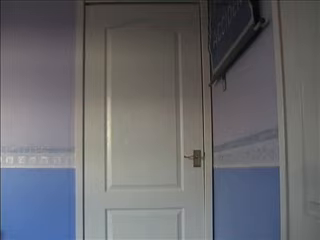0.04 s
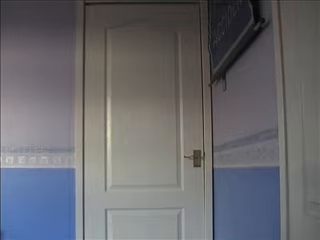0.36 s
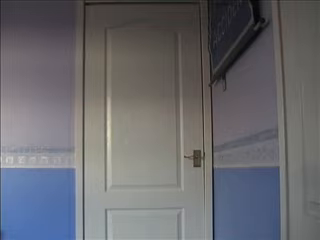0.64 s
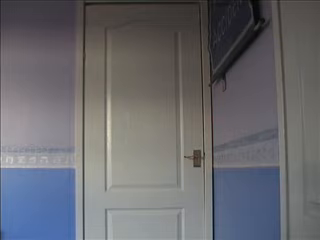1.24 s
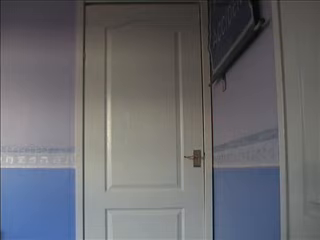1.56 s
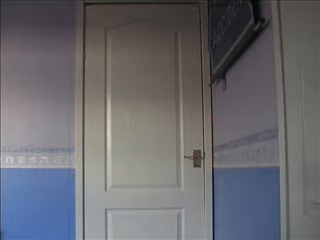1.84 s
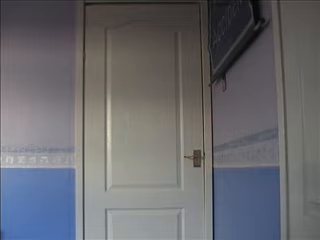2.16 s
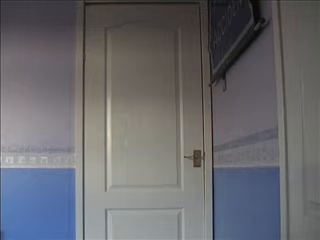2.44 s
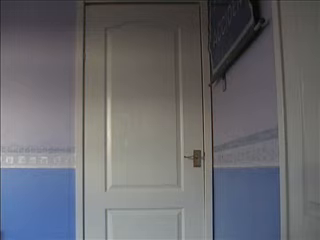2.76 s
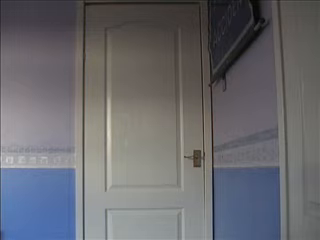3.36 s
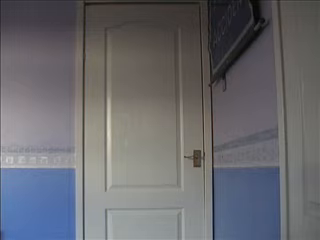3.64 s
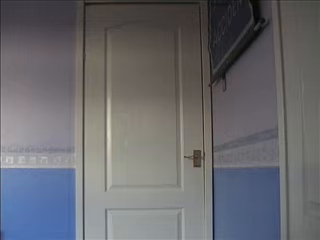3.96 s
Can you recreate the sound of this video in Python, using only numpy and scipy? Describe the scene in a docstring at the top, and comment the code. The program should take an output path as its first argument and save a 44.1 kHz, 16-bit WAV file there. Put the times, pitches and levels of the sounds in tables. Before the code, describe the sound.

Low electrical hum slowly swelling indoors, with a faint fan and a few soft rustles.

```python
"""Mains hum swells slowly in a quiet room, with the tones of a running fan and a wash of air.
Two near-equal hums beat; the fan sounds at multiples of its shaft rate, other motors farther off.
Soft floor bumps and faint rustles sound nearby, as of someone shifting their weight.
The camera adds its own hiss and thin whine, and its hum filter cuts a row of narrow notches."""
import sys
import numpy as np
from scipy.fft import rfft, irfft, next_fast_len
from scipy.io import wavfile
from scipy.ndimage import map_coordinates

SR = 44100
rng = np.random.default_rng(int(sys.argv[2]) if len(sys.argv) > 2 else 0)


def transcribe(u):
    """Save the signal u as a 16-bit wav file named by the first command-line argument.

    u: samples, shape (n,) or (channels, n), limited to [-1, 1]; the rate is SR.
    q: integer samples, one column per channel.
    """
    v = np.clip(np.atleast_2d(u).T, -1, 1)
    q = np.round(v * 32767).astype(np.int16)
    wavfile.write(sys.argv[1], SR, q)


N = 176400
TOP_HZ = 12250  # camera band limit
# stereo image of nearby sounds (frequency [Hz], L/R correlation)
NEAR_CORRELATION = [(100, .8), (1000, 1)]


def amp(db):
    """Decibels to gain."""
    return 10 ** (np.asarray(db) / 20)


def unit(x):
    """Scale to rms 1."""
    return x / np.sqrt(np.mean(x ** 2) + 1e-20)


def along(points, hz):
    """Interpolate (frequency [Hz], value) points on a log axis."""
    knots_hz, values = np.transpose(points)
    return np.interp(np.log(hz + 1), np.log(knots_hz + 1), values)


def clock():
    """Sample times [s]."""
    return np.arange(N) / SR


def wobble(rate_hz):
    """Smooth random curve, rate_hz knots a second."""
    coarse_s = np.linspace(0, N / SR, num=800)
    curve = map_coordinates(rng.standard_normal(256), [coarse_s * rate_hz], mode="mirror")
    return np.interp(clock(), coarse_s, curve)


def filtered(x, response):
    """Apply response(hz) by zero-padded FFT."""
    size = next_fast_len(N + SR // 2)
    return irfft(rfft(x, size) * response(np.fft.rfftfreq(size, 1 / SR)), size)[..., :N]


def noise(spectrum, correlation):
    """Coloured stereo noise, rms 1."""
    def mid_side_gains(hz):
        angle = np.arccos(np.clip(along(correlation, hz), -1, 1)) / 2
        return amp(along(spectrum, hz)) * [np.cos(angle), np.sin(angle)]
    mid, side = filtered(rng.standard_normal((2, N)), mid_side_gains)
    return unit(np.array([mid + side, mid - side]))


def tone(hz, drift_rad, rate_hz):
    """Sine with drifting phase, rms 1."""
    return np.sqrt(2) * np.sin(2 * np.pi * (hz * clock() + rng.random()) + drift_rad * wobble(rate_hz))


def swell(peak_s, db, rise_s, t60_s):
    """Envelope: Gaussian rise, exponential decay."""
    t = clock() - peak_s
    return amp(db) * np.exp(-(np.minimum(t, 0) / rise_s) ** 2 - np.log(1000) * np.maximum(t, 0) / t60_s)


def mains_hum(hz=120.2, beat_depth=0.34, beat_period_s=2.87, beat_peak_s=2.88):
    """Two mains-driven hums slide in and out of step."""
    t = clock()
    beat = 1 + beat_depth * np.exp(2j * np.pi * (t - beat_peak_s) / beat_period_s)
    carrier = np.exp(2j * np.pi * (hz * t + rng.random()))
    return amp(-44.5) * np.sqrt(2) * np.real(beat * carrier)


def fan(shaft_hz=43.08, waver_db=1):
    """Slightly unsteady tones at multiples of the shaft rate."""
    orders = [1, 3, 4, 5, 6, 7, 9, 12, 13]  # (multiple of shaft rate)
    levels_db = [-66, -64.5, -49.5, -65, -59, -68.5, -73, -72, -75.5]  # per order (level [dB])
    return sum(amp(db + waver_db * wobble(5)) * tone(k * shaft_hz, drift_rad=0.042 * k, rate_hz=2.04)
               for k, db in zip(orders, levels_db))


def distant_motors():
    """Slightly drifting tones of other motors in the house."""
    tones_hz = [39.8, 73.4, 79.6, 167.8, 331.5, 580, 809, 996, 1587]  # (frequency [Hz])
    levels_db = [-72, -61, -56, -58, -65, -75.5, -79, -78, -76.5]  # per tone (level [dB])
    return sum(amp(db) * tone(hz, drift_rad=0.19, rate_hz=1.9) for hz, db in zip(tones_hz, levels_db))


def air(waver_db=0.23):
    """Low wash of moving air."""
    spectrum = [(20, -27), (42, -4), (70, -0.5), (110, -3), (210, -1.5), (330, -4), (430, -10), (560, -7.5),
                (750, -12.5), (1200, -17), (2500, -28.5), (6000, -44)]  # (frequency [Hz], relative density [dB])
    correlation = [(40, 0.68), (110, 0.26), (230, 0.6), (400, 0.24), (1000, 0.23), (3000, 0.31)]  # (frequency [Hz], L/R correlation)
    return amp(-52 + waver_db * wobble(6.47)) * noise(spectrum, correlation)


def floor_bumps():
    """Each soft bump rings one low mode of the floor."""
    bumps = [(1.02, -37, 42.5, 0.41, 0.018), (1.865, -41, 42.6, 0.3, .014), (2.643, -36, 58.6, 0.21, 0.014),
             (2.78, -35.5, 71.8, 0.33, .008), (3.139, -42, 60, .2, .014), (3.199, -33.5, 68.3, 0.11, .004),
             (3.74, -53, 45, .2, .014)]  # (time [s], level [dB], pitch [Hz], t60 [s], rise [s])
    out = np.zeros(N)
    for start_s, db, hz, t60_s, rise_s in bumps:
        t = np.maximum(clock() - start_s, 0)
        envelope = np.exp(-np.log(1000) * t / t60_s) * (1 - np.exp(-t / rise_s))
        out += amp(db) * envelope * np.sin(2 * np.pi * hz * t)
    return out


def floor_knocks():
    """Dull knocks of the floor: bursts of low noise."""
    knocks = [(0.019, -45), (2.19, -51), (2.31, -50), (2.53, -55), (2.915, -46.5), (3.195, -46)]  # (time [s], level [dB])
    spectrum = [(60, -14), (130, -11), (200, -5.5), (280, -2.5), (400, -19), (900, -32), (3000, -60)]  # (frequency [Hz], relative density [dB])
    envelope = sum(swell(peak_s, db, rise_s=0.017, t60_s=0.47) for peak_s, db in knocks)
    return envelope * noise(spectrum, NEAR_CORRELATION)


def rustles():
    """Faint shuffles: swells of midrange noise."""
    shuffles = [(.03, -53, 0.08, 0.4), (.15, -58, 0.047, 0.42), (1.2, -60, .05, .3),
                (2.18, -54, 0.019, .35), (2.31, -61.5, 0.026, 0.27), (2.56, -56, 0.044, .45),
                (2.81, -56, 0.046, .5), (2.89, -57.5, 0.024, .25), (3.19, -55.5, 0.062, 0.28)]  # (time [s], level [dB], rise [s], t60 [s])
    spectrum = [(150, -14), (400, -1), (600, 0.5), (920, 1), (1150, -4), (1500, -3), (2200, -10.5),
                (5000, -21.5), (12000, -38)]  # (frequency [Hz], relative density [dB])
    return sum(swell(*row) for row in shuffles) * noise(spectrum, NEAR_CORRELATION)


def cloth_brush():
    """One brighter brush of cloth: soft lead-in, then the stroke."""
    swells = [(2.42, -63, 0.21, 1), (2.518, -50, 0.0057, 0.3)]  # (time [s], level [dB], rise [s], t60 [s])
    spectrum = [(500, -20), (1300, -6), (1900, -2.5), (2450, 1.5), (3500, -4), (4300, -13), (11000, -30)]  # (frequency [Hz], relative density [dB])
    return sum(swell(*row) for row in swells) * noise(spectrum, NEAR_CORRELATION)


def camera_whine():
    """Strongest lines of the camera's whine, drifting in phase."""
    lines_hz = [3058, 5633, 5793, 5890, 6372, 6406, 6669, 6776, 6829, 6856, 6950, 8601, 8900, 9992]  # (frequency [Hz])
    levels_db = [-80, -82.5, -73.5, -90, -90, -80, -76.5, -74, -84, -89, -77.5, -78, -82, -88]  # per line (level [dB])
    return sum(amp(db) * tone(hz, drift_rad=0.39, rate_hz=6.47) for hz, db in zip(lines_hz, levels_db))


def camera_treble(swing=1.3, flicker_db=1.13):
    """The camera's high hiss; its level flickers."""
    contour = [(0.03, -64), (0.13, -69), (0.14, -65), (0.81, -66.5), (0.84, -64.5), (1.05, -66.5),
               (1.07, -65), (1.43, -65), (1.57, -65.5), (1.65, -66), (1.68, -67), (1.92, -64), (2.0, -66.5),
               (2.13, -64.5), (3.61, -65), (3.64, -67), (3.86, -64.5), (3.97, -64.5)]  # (time [s], level before centring and swing [dB])
    spectrum = [(3500, -24), (4050, 1.5), (5000, -3), (6000, 2.5), (7200, -1.5), (8200, -4), (9400, -4.5),
                (10250, 3), (10950, -8.5), (11600, 0.5), (12200, -14)]  # (frequency [Hz], relative density [dB])
    correlation = [(4000, 0.78), (7000, 1), (8300, 1), (9400, 0.79), (10350, 0.16), (10900, 1),
                   (11600, 0.57)]  # (frequency [Hz], L/R correlation)
    level = np.interp(clock(), *np.transpose(contour))
    offset_db = swing * (level - level.mean()) + flicker_db * wobble(11)
    return amp(-62.5 + offset_db) * noise(spectrum, correlation)


def whine_bed(count=260, scatter_hz=11, scatter_db=2.0):
    """Weak steady lines, each a little out of phase at the two microphones."""
    outline = [(3500, -18), (5200, -7.5), (5700, 3.5), (6150, -11), (6850, 7), (7250, -13), (8700, -6),
               (10200, -7.5), (11800, -9), (12250, -21)]  # (frequency [Hz], relative level [dB])
    hz = np.linspace(outline[0][0], TOP_HZ, count) + scatter_hz * rng.standard_normal(count)
    gains = amp(along(outline, hz) + scatter_db * rng.standard_normal(count))
    lines = gains * np.exp(2j * np.pi * rng.random(count))
    skew = np.exp(0.4j * rng.standard_normal(count))
    bins = np.zeros((2, N // 2 + 1), complex)
    bins[:, np.round(hz * N / SR).astype(int)] = lines * skew, lines / skew
    return amp(-66) * unit(irfft(bins, N))


def microphone_hiss():
    """Steady hiss, mostly below 4 kHz."""
    spectrum = [(100, -2), (1000, -2), (1500, 0), (2000, 0), (2800, 0), (3300, 1.5), (3900, -3),
                (4200, -20), (6000, -21), (12000, -28)]  # (frequency [Hz], relative density [dB])
    correlation = [(1000, 0.68), (2700, 0.53), (3300, 0.76), (3600, .35), (3950, 0.12), (4300, 0.59)]  # (frequency [Hz], L/R correlation)
    return amp(-58.5) * noise(spectrum, correlation)


def scene():
    """Stereo mix, a little stronger on the right."""
    room = mains_hum() + fan() + distant_motors() + air()
    movement = floor_bumps() + floor_knocks() + rustles() + cloth_brush()
    camera = camera_whine() + camera_treble() + whine_bed() + microphone_hiss()
    balance_db = [[-0.56], [1.05]]
    return (room + movement + camera) * amp(balance_db)


def record(dry):
    """The camera's comb filter notches each multiple of notch_hz; nothing passes above TOP_HZ."""
    notch_hz, depth, feedback = 150, 0.84, 0.5248
    def response(hz):
        delay = np.exp(-2j * np.pi * hz / notch_hz)
        comb = (1 - depth * delay) / (1 - feedback * delay)
        peak_gain = (1 + depth) / (1 + feedback)
        return comb / peak_gain * (hz < TOP_HZ)
    return filtered(dry, response)


dry = scene()
out = record(dry)
transcribe(out)
```